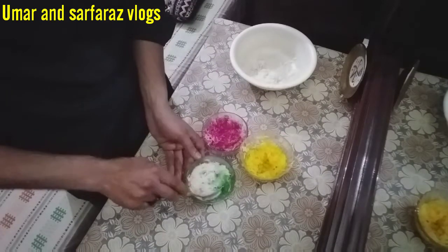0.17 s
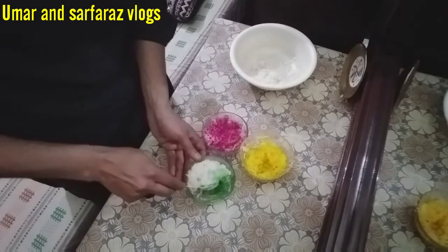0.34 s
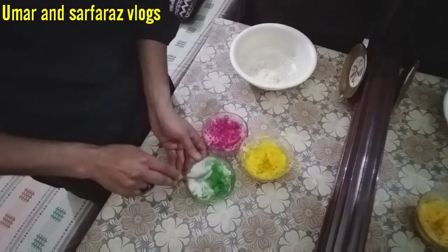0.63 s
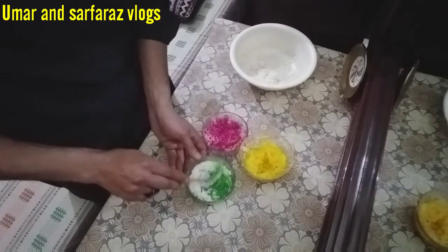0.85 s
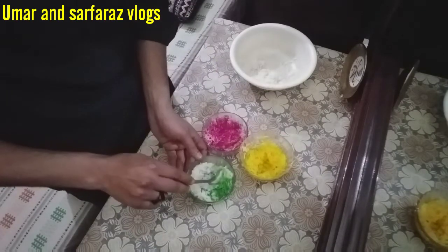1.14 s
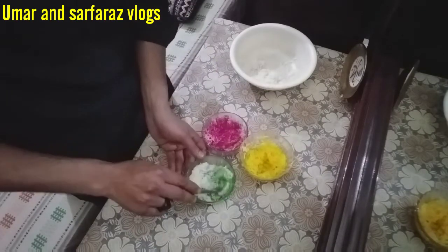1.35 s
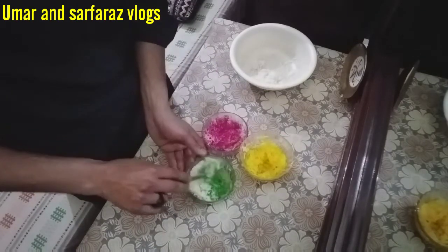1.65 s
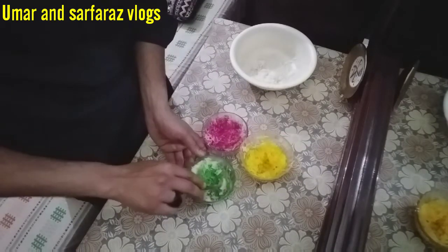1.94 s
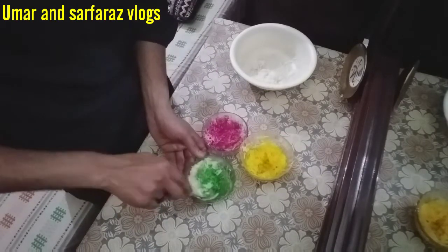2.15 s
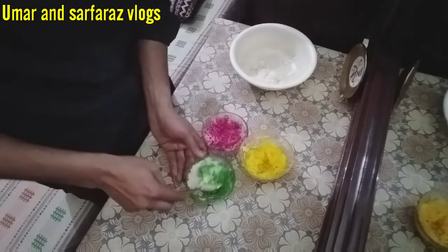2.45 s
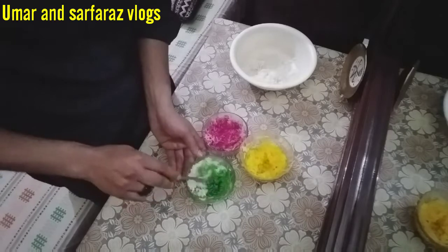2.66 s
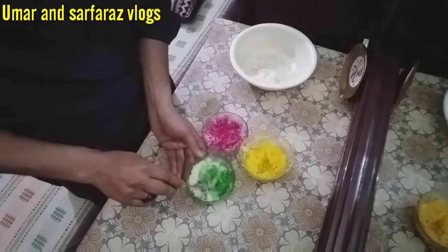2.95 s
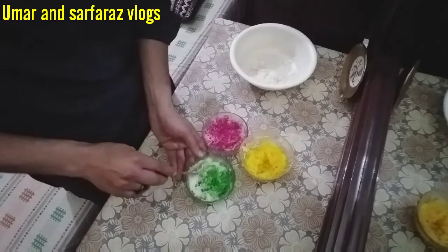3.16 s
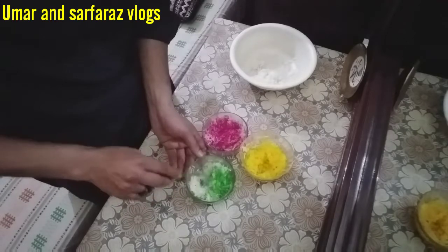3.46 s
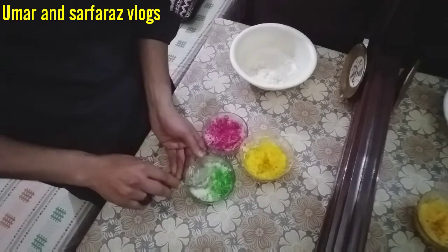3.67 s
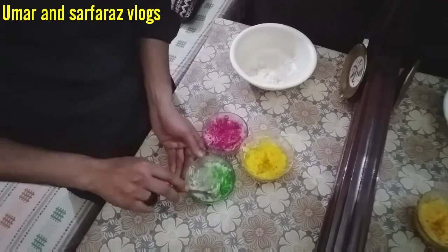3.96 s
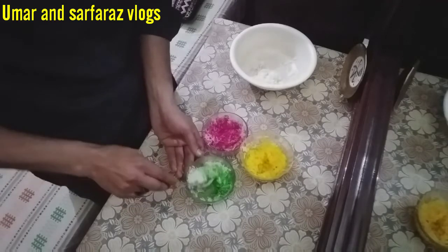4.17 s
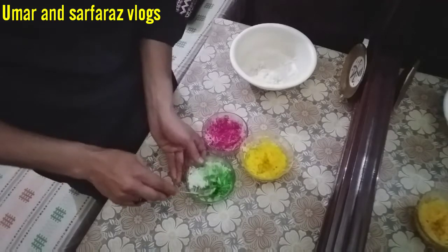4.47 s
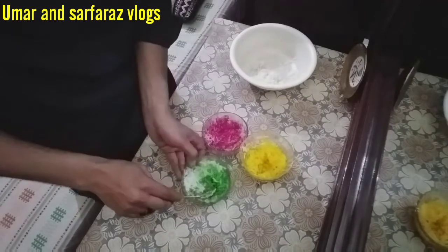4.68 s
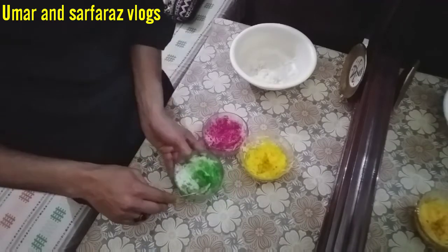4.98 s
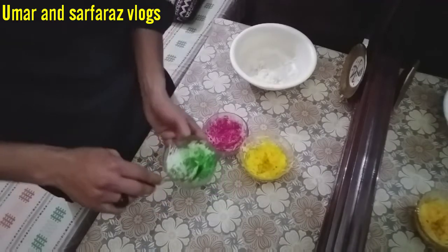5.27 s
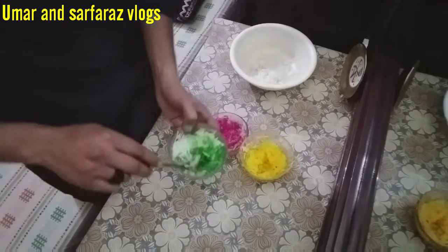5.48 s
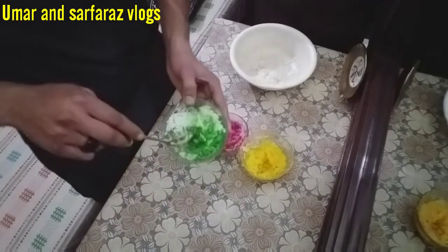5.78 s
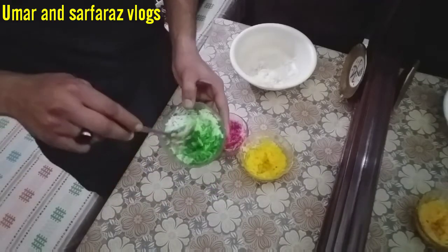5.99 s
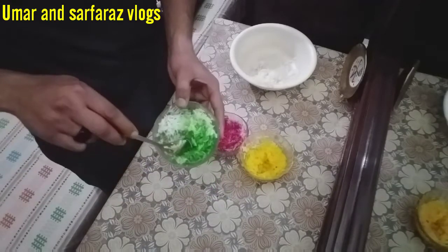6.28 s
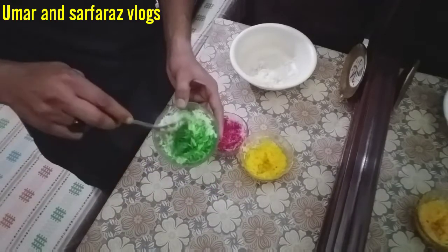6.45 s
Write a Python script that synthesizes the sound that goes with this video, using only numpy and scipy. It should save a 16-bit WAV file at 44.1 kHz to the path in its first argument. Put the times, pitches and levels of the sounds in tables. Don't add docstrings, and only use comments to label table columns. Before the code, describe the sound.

Sharp spoon knocks on glass, spaced irregularly with small gaps, crack brightly and die quickly, bumping the table beneath. The strongest are a double clink past the middle and a heavy bump near five seconds; short scratchy scrapes and soft grain patter follow, then a clear final ring. Small kitchen reverberation, near microphone, constant thin whistling hiss over a low hum.

```python
import sys
import numpy as np
from scipy import signal
from scipy.io import wavfile
from scipy.ndimage import uniform_filter1d

SR = 44100
rng = np.random.default_rng(int(sys.argv[2]) if len(sys.argv) > 2 else 0)


def nominal_scale(level):
    x = np.asarray(level, float) / 20
    return 10 ** x


def master(y):
    cut = np.clip(np.atleast_2d(y).T, -1, 1)
    pcm = np.round(cut * 32767)
    wavfile.write(sys.argv[1], SR, pcm.astype(np.int16))


N = 291942


def evened(x):
    return x / np.sqrt(np.mean(x ** 2) + 1e-20)


def read(points, hz):
    f, value = np.transpose(points)
    return np.interp(np.log(hz + 1), np.log(f + 1), value)


def level(rows):
    s, db = np.transpose(rows)
    return nominal_scale(np.interp(np.arange(N) / SR, s, db, left=-200, right=-200))


def add(mix, s, sound):
    part = mix[round(s * SR):][:len(sound)]
    part += sound[:len(part)]


def band(x, lo_hz, hi_hz):
    return signal.sosfilt(signal.butter(2, [lo_hz, hi_hz], "band", fs=SR, output="sos"), x)


def highpass(x, order, hz):
    return signal.sosfilt(signal.butter(order, hz, "high", fs=SR, output="sos"), x)


def ring(modes, length=1, spread_db=0, detune=0, rise_ms=0.14, scatter=0):
    hz, db, t60 = np.transpose(modes)[:, :, None]
    t = np.arange(0, np.clip(t60.max() * length, .03, .5), 1 / SR)
    chance = rng.standard_normal((3, len(modes), 1))
    turns = hz * (1 + detune * chance[1]) * t + scatter * chance[2]
    envelope = nominal_scale(db + spread_db * chance[0] - 60 * t / (t60 * length))
    sines = (envelope * np.sin(2 * np.pi * turns)).sum(0)
    return sines * (1 - np.exp(-1000 * t / rise_ms))


def tuned(ring_hz, split):
    return [(ring_hz * factor, db, t60) for factor, db, t60 in split]


def slips_at(rate_hz, spread_db):
    strength = nominal_scale(spread_db * np.minimum(rng.exponential(1, N), 4))
    return strength * (rng.random(N) < rate_hz / SR) * rng.choice([-1, 1], N)


# pitch_hz, density_db (per Hz)
FLOOR_SPECTRUM = [(25, -30), (60, -11), (105, 1.5), (200, -15), (450, -19), (1000, -19), (1600, -17),
                  (2300, -5), (2950, -12.5), (4300, -11.5), (7700, -17), (9000, -26.5), (13500, -27.5),
                  (15650, -29.5), (15800, -65)]
# pitch_hz, width_hz, level_db
WHISTLE_BANDS = [(1893, 24, -6), (2384, 47, -8), (2575, 33, -3), (2694, 17, 5.5), (2802, 60, -1),
                 (3155, 25, 5), (3273, 9.2, 6), (3460, 46.3, -5.5), (3990, 110, -4.5)]
# time_s, level_db
HISS_SWELL = [(0.0, -59), (1.5, -60), (1.8, -58.5), (3.72, -59.5), (4.57, -62.5), (5.24, -59.5),
              (6.62, -60)]


def hiss():
    frames, hz = N // 512 + 5, np.fft.rfftfreq(2048, 1 / SR)
    real, imaginary, patches = rng.standard_normal((frames, 1025, 3)).T
    patches = evened(uniform_filter1d(uniform_filter1d(patches, 9, 0), 7, 1))
    f, width, db = np.transpose(WHISTLE_BANDS)[:, :, None]
    bands = (nominal_scale(db - 1.5) ** 2 / (1 + (2 * (hz - f) / width) ** 2)).sum(0)
    bands = bands / (1 + (hz / 5500) ** 8)
    shape = np.sqrt(nominal_scale(read(FLOOR_SPECTRUM, hz) - 2.0) ** 2 + bands)
    spectrum = (real + 1j * imaginary) * shape[:, None] * nominal_scale(patches)
    x = signal.istft(spectrum, nperseg=2048, noverlap=1536)[1][:N]
    return evened(x) * level(HISS_SWELL) * nominal_scale(3.0)


# pitch_hz, t60_s
KITCHEN_DECAY = [(150, 0.43), (400, 0.28), (1000, 0.36), (2800, 0.25), (7000, 0.24), (15000, 0.27)]


def kitchen(paths):
    taps = np.zeros((3, SR // 2))
    slots = np.arange(120, SR // 2 - 12, 12)
    at = slots + rng.integers(0, 12, (3, len(slots)))
    np.put_along_axis(taps, at, rng.choice([-1., 1.], at.shape), 1)
    hz, t, z = signal.stft(taps, SR, nperseg=256)
    tail = signal.istft(z * nominal_scale(-60 * t / read(KITCHEN_DECAY, hz)[:, None]), SR, nperseg=256)[1]
    tail = tail / np.linalg.norm(tail, axis=1)[:, None]
    return signal.fftconvolve(paths, tail, axes=1)[:, :N].sum(0)


# time_s, level_db
SLIDE_LEVEL = [(0.54, -74.5), (0.586, -52), (0.656, -45), (0.69, -66), (0.73, -52), (0.786, -65),
               (0.822, -62), (0.86, -89)]
# time_s, level_db
SHIFT_LEVEL = [(4.7, -94), (4.762, -72), (4.94, -75), (4.98, -81), (5.04, -74), (5.06, -90)]
# pitch_hz, level_db, t60_s
TABLE_MODES = [(118, -9, .22), (165, -14, .3), (283, -2, .24), (277, -22, .55), (235, -2, .05),
               (366, -11, .2), (406, -11, .2), (560, -16, .2), (660, -20, .2)]
# centre_s, level_db, pitch_hz, length_ms, ring_db
BASE_BUMPS = [(.25, -54, 280, 3, 12.5), (1.687, -32, 210, 3.2, -15), (2.235, -41.5, 250, 1.5, -6.5),
              (3.461, -44, 262, 7.6, -7.5), (3.735, -53.5, 40.6, 26, -34), (5.11, -13.5, 241, 3.4, -8.5),
              (5.111, -23.5, 612, 2.3, -31), (5.1172, -21, 391, 2.8, -21), (5.14, -58, 54.4, 30, -29),
              (5.687, -56, 190, 14, -31)]


def table():
    rub = band(band(rng.standard_normal(N), 105, 148), 98, 450)
    rub += 0.16 * band(rng.standard_normal(N), 215, 307)
    shift = band(band(rng.standard_normal(N), 140.5, 320), 140.5, 320)
    out = level(SLIDE_LEVEL) * evened(rub) + level(SHIFT_LEVEL) * evened(shift)
    t = np.arange(-SR // 25, SR // 25) / SR
    for s, db, hz, length_ms, ring_db in BASE_BUMPS:
        packet = np.cos(2 * np.pi * hz * t) * np.exp(-(1000 * t / length_ms) ** 2)
        add(out, s + t[0], -nominal_scale(db) * packet)
        modes = TABLE_MODES + [(hz, -3, .06)]
        add(out, s, nominal_scale(db + ring_db) * ring(modes, spread_db=2, detune=.006, rise_ms=3))
    return out


# time_s, level_db
SLUMP_LEVELS = [
    [(1.88, -86), (1.96, -74.5), (2.04, -86)],
    [(2.36, -76), (2.42, -69.5), (2.5, -88)],
    [(5.41, -85), (5.44, -65), (5.53, -85), (5.6, -73), (5.64, -76), (5.7, -80), (5.74, -71), (5.85, -75),
     (5.98, -87)],
]


def rice():
    hollow = ring([(630, -5, 0.039), (776, 0, 0.031), (990, -1, 0.025)], rise_ms=3.2)
    patter = signal.oaconvolve(slips_at(400, 2.7), hollow)[:N]
    return evened(patter) * sum(level(rows) for rows in SLUMP_LEVELS)


# start_s, level_db, pitch_hz
GRAIN_TICKS = [(0.7957, -50, 8400), (2.6444, -63, 6640), (4.1876, -53, 7400), (4.4177, -47.5, 7480),
               (4.8604, -47.5, 7500), (5.042, -47, 7300), (5.6924, -55, 7400)]


def grains():
    out = np.zeros(N)
    for s, db, hz in GRAIN_TICKS:
        add(out, s, nominal_scale(db) * ring([(hz, -1.5, .008), (1.47 * hz, -9, .006)]))
    return out


# time_s, level_db
SCRAPE_STROKES = [
    [(5.43, -60), (5.438, -44), (5.528, -63), (5.594, -52.5), (5.61, -42), (5.618, -54.5), (5.654, -47.5),
     (5.67, -73), (5.7, -68)],
    [(5.7, -65), (5.708, -67), (5.738, -43.5), (5.748, -59), (5.872, -81.5), (5.892, -53), (5.95, -76)],
]
# pitch_factor, level_db, t60_s
BOWL_SPLITS = [
    [(1, 0, .14), (1.011, -17, .3), (.999, -15, .5)],
    [(1, 0, .07), (1.011, -14, .35), (1.043, -12, .05), (.999, -9, .5)],
    [(1, 0, .12), (1.0155, -9, .06), (.9995, -20, .35)],
]


def scrape():
    slips = slips_at(1200, 3)
    bowl = [(2460, -1, 0.19)] + tuned(4570, BOWL_SPLITS[1]) + tuned(6840, BOWL_SPLITS[2])
    spoon = [(9270, -11, 0.08), (10680, -28, .07), (12200, -12, .07)]
    body = ring(bowl + spoon, 0.13)
    body[:64] += 1.1 * band(rng.standard_normal(64), 1000, 10500) * np.exp(-np.arange(64) / 12)
    strokes = sum(level(rows) for rows in SCRAPE_STROKES)
    scraped = signal.oaconvolve(slips * strokes, body)[:N]
    return scraped / np.sqrt(np.mean(slips ** 2) * (body ** 2).sum())


# start_s, level_db, hardness_db (per octave), rim_clack_db, belly_clack_db
KNOCKS = [(0.2299, -14, 3.5, -7, -15), (.248, -32, -9, -1, -2.5), (1.0912, -28, 3.5, -2, -5),
          (1.5891, -14, 1, -28, -6.5), (1.617, -16, -0.5, -19, -6.5), (1.6856, -33.5, -8, -6.5, -5),
          (2.113, -16, 3, -16, -9), (2.2317, -34.5, -1, -9.5, -2.5), (2.329, -45, -8.5, -11, -6),
          (2.4032, -41, 1, -6.5, -5), (3.006, -24.5, -1.5, -9.5, 0.5), (3.398, -18.5, -2.5, -8.5, -4),
          (3.455, -30.5, -5.5, -4, -5.5), (3.702, -11, 5.5, -5, -5), (3.7321, -11.5, 0.5, -8, -0.5),
          (4.2699, -23, -2, -49, -0.5), (5.065, -21, -2, -6, -4), (5.0696, -14.5, 1.5, -10.5, -6.5),
          (5.4176, -25, 3, -28, -6.5), (5.6093, -37, 4, -10, -6), (5.783, -48, -3.5, -5.5, -1),
          (5.8888, -49.5, -2.5, 1, -0.5), (6.2614, -13, 4, -1.5, -7.5), (6.359, -30, 0.5, -11, -7)]


def path(s):
    return np.argmin(abs(np.transpose(KNOCKS)[0] - s)) % 3


def choke(rings):
    s = np.transpose(KNOCKS)[0]
    out, t = rings.copy(), np.arange(SR // 4) / SR
    for k in np.flatnonzero((np.diff(s) > .022) & (np.diff(s) < .036)):
        part = out[k % 3, round(s[k + 1] * SR):][:len(t)]
        part *= .3 + .7 * np.exp(-t / .003)
    return out


def thump(thump_db, knock_db):
    modes = [(280, -0.5, 0.19), (260, -21, 0.45), (228, -3, 0.073),
             (368.6, -13, 0.21), (176.2, -11, 0.19), (126.6, -12, 0.2)]
    out = nominal_scale(thump_db - 2.5) * ring(modes, rise_ms=0.53)
    t = np.arange(1024) / SR
    dull = evened(band(rng.standard_normal(1024), 500, 883))
    out[:1024] += nominal_scale(knock_db + 3.0) * dull * np.exp(-t / 0.0051) * (1 - np.exp(-t / 0.00013))
    return out


# start_s, thump_db, dull_knock_db
TABLE_THUMPS = [(0.2323, -33, -39), (.2476, -59, -43), (1.0929, -43, -45), (1.5889, -32.5, -39.5),
                (1.6177, -37, -39), (1.6854, -38.5, -64), (2.1162, -30, -39.5), (2.2311, -47, -50),
                (3.0059, -42.5, -46), (3.4, -37.5, -38), (3.455, -40.5, -42), (3.701, -34, -34),
                (3.7319, -40.5, -32.5), (4.2693, -39.5, -40.5), (5.0651, -59, -64), (5.0705, -33.5, -37.5),
                (5.4168, -57, -47), (5.609, -77, -57), (5.785, -67, -71), (6.2613, -53.5, -36),
                (6.3575, -67, -53.5)]


def thumps():
    out = np.zeros((3, N))
    for s, thump_db, knock_db in TABLE_THUMPS:
        add(out[path(s)], s, thump(thump_db, knock_db))
    return out


# pitch_hz, level_db, t60_s
CONTACT_MODES = [
    [(1475, 0, .08)],
    [(3487, 0, .11), (5010, -3, .12)],
    [(10195, 0, .09), (6320, 7, .08), (8390, 0, .08), (14085, -2, .08), (12280, -5, .08)],
    [(10665, 0, .07), (14550, -6, .06), (6875, 9, .09), (4760, 6, .18), (2615, 5, .06)],
    [(12140, 0, .07), (9260, -4, .07), (15425, -8, .05)],
    [(4544, 0, .34), (4592, -1, .24)],
    [(3510, 0, .16), (3474, -5, .12), (4720, -6, .07), (7000, -12, .2)],
    [(2378, 0, .17), (4533, -3, .17), (635, -14, .15)],
]
# start_s, level_db
CONTACT_HITS = [
    [(1.0918, -47), (2.113, -45), (4.2688, -48.5), (5.0645, -60), (5.0685, -66), (5.4178, -51)],
    [(1.5888, -37), (1.617, -42), (1.64, -49), (3.701, -74), (3.7315, -46), (5.0645, -60)],
    [(1.0918, -53.5), (1.5888, -70), (3.3981, -49.5)],
    [(3.701, -34.5), (3.7315, -34), (5.0645, -49)],
    [(.2295, -40), (1.617, -53), (3.701, -27.5), (5.4178, -39.5), (6.2613, -37)],
    [(.2297, -33.5), (1.0918, -47), (2.113, -55), (3.733, -57.5), (5.068, -48)],
    [(5.0685, -29), (3.733, -46)],
    [(6.2624, -31.5), (3.399, -43.5)],
]


def contact_rings():
    out = np.zeros((3, N))
    for modes, blows in zip(CONTACT_MODES, CONTACT_HITS):
        for s, db in blows:
            add(out[path(s)], s, nominal_scale(db + 2.5) * ring(modes, detune=0.00096))
    return out


# start_s, low_hz, middle_hz, top_hz
RING_PITCHES = [(0, 2410, 4547, 6785), (2.3, 2417, 4750, 6780), (3.0, 2475, 4538, 6755),
                (3.6, 2410, 4562, 6778), (3.72, 2485, 4592, 6760), (4.2, 2460, 4650, 6460),
                (4.6, 2456, 4565, 6700), (5.3, 2438, 4585, 6900), (5.5, 2485, 4562, 6810),
                (6.0, 2412, 4510, 6783), (6.3, 2405, 4560, 6790)]
RING_LENGTHS = [1.1, .9, .9]
# start_s, low_db, middle_db, top_db, length_factor
BOWL_HITS = [(0.2297, -20.5, -24, -22, 0.39), (0.249, -32, -43, -47, .6), (1.0918, -26, -34, -39.5, 0.94),
             (1.5913, -22, -45, -70, 0.52), (1.619, -59, -49, -70, 0.36), (2.113, -23, -52, -52.5, 0.51),
             (2.2308, -46, -84, -70, 0.96), (2.4042, -74, -36.5, -70, 0.13),
             (3.3991, -25.5, -28.5, -30, 0.25), (3.452, -54, -48.5, -72, 0.47),
             (3.701, -26.5, -44.5, -18.5, 1), (3.733, -25, -24, -16, 0.47), (4.2685, -70, -34.5, -37, 0.26),
             (5.0638, -37, -36, -26, 0.38), (5.0682, -29.5, -54, -59, 1), (5.419, -29, -30, -31, 0.21),
             (5.562, -59, -54, -60, .4), (5.598, -64, -51, -62, 0.94), (5.607, -47, -57, -55, 0.32),
             (5.784, -70, -59, -57, .3), (5.8895, -67, -66, -57, 0.77), (6.2626, -19.5, -17, -20, 0.37),
             (6.3574, -37, -40, -43, 0.6)]


def bowl_rings():
    out = np.zeros((3, N))
    for s, *dbs, length in BOWL_HITS:
        pitches = [row[1:] for row in RING_PITCHES if row[0] <= s][-1]
        for hz, db, split, share in zip(pitches, dbs, BOWL_SPLITS, RING_LENGTHS):
            sound = ring(tuned(hz, split), max(length * share, .1), rise_ms=0.42)
            add(out[path(s)], s, nominal_scale(db + 2.5) * sound)
    return out


def chatter(top_db):
    t = np.arange(1024) / SR
    noise = evened(band(band(rng.standard_normal(1024), 8500, 16500), 6800, 13600))
    decay = np.exp(-t / 0.0019) + 0.11 * np.exp(-t / 0.0083)
    return nominal_scale(top_db + 6.5) * noise * decay * (1 - np.exp(-t / 0.00062))


def tilt_db(hard_db, hz):
    return hard_db * np.log2(hz / 3500)


# pitch_hz, level_db, t60_s
CLACK_MODES = [
    [(2397, 1.5, 0.027), (2526, -6, 0.015)],
    [(1473, 1.5, 0.013), (1707, 1, 0.017)],
    [(3243, 4.5, 0.006), (3703, -4.5, 0.018), (2813, -6, 0.013), (3416, -8.5, 0.017), (2570, -8.5, 0.013)],
    [(4733, -2.5, 0.005), (4565, -11.5, 0.028), (5184, -8, 0.0062), (4707, -8.5, 0.019), (5700, -15, 0.013)],
    [(6590, -6.5, 0.013), (6310, -10, 0.012), (7114, -8.5, 0.013)],
    [(7700, -6.5, 0.014), (8340, -8.5, 0.016)],
]
# low_db, high_1_db, high_2_db, high_3_db
CONTACT_COLOUR = [(-13.5, 2, -6, -3.5), (-15, 2, -3, -12), (-12, 3.5, 2.5, -15), (-14.5, 2, -4, -6),
                  (-13.5, 1.5, -2, -9.5), (-14.5, 1, -3, -10), (-11, 0, -3.5, -6), (-11, -5, -2.5, -13),
                  (-14.5, -2, 4, -10), (-14, -10, -1, -10), (-10.5, -2.5, -3, -12), (-11.5, 3.5, -4, -10.5),
                  (-14, -0.5, -2.5, -10), (-12, 4, 2, -10.5), (-11.5, 5.5, -3.5, -9.5),
                  (-13.5, -0.5, -3.5, -12.5), (-14, 4, -3, -17), (-11.5, 3.5, -1, -10.5), (-19, 4, -4, -7),
                  (-12, 4, -12, -13), (-13, 0, -10.5, -10), (-12, 1, -3, -12), (-13, 2, -0.5, -12.5),
                  (-15, -2, -7, -9)]


def cracks():
    out = np.zeros((3, N))
    for (s, db, hard_db, rim_db, belly_db), (low_db, *high_dbs) in zip(KNOCKS, CONTACT_COLOUR):
        add(out[path(s)], s, chatter(db - 22.5 + tilt_db(hard_db, 11000)))
        shares = [low_db, belly_db, *high_dbs]
        tilted = [share + tilt_db(hard_db, modes[0][0]) for share, modes in zip(shares, CLACK_MODES[1:])]
        for modes, share_db in zip(CLACK_MODES, [rim_db, *tilted]):
            clack = ring(modes, spread_db=1.5, detune=.01, rise_ms=.6, scatter=.3)
            add(out[path(s)], s, nominal_scale(db + share_db + 3.5) * clack)
    return out


def scene():
    hits = highpass(cracks() + thumps(), 4, 95)
    rings = highpass(choke(bowl_rings() + contact_rings()), 4, 95)
    hits[0] += table() + grains() + rice()
    rings[0] += scrape()
    sent = nominal_scale(-5.0) * hits + nominal_scale(-12.5) * rings
    sent = highpass(sent, 2, 380)
    return ((hits + rings).sum(0) + kitchen(sent) + hiss())[None]


def top_cut(x):
    return signal.sosfilt(signal.butter(12, 16830, fs=SR, output="sos"), x)


def record(dry):
    rounded = 1.3 * np.tanh(dry / 1.3)
    closed = signal.sosfiltfilt(signal.butter(12, 15900, fs=SR, output="sos"), rounded)
    return top_cut(closed)


dry = scene()
out = record(dry)
master(out)
```